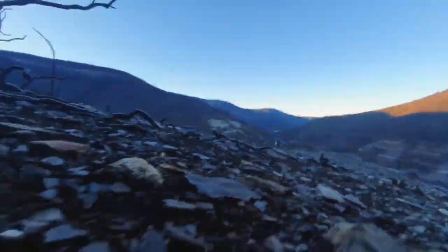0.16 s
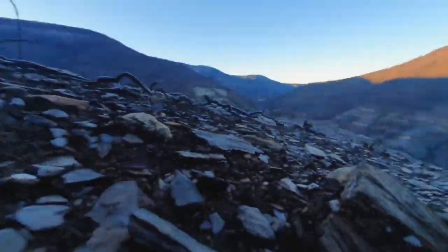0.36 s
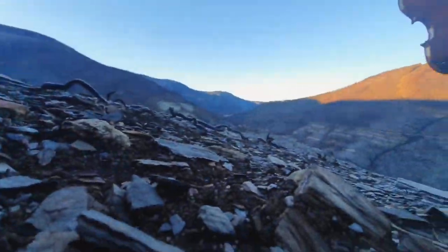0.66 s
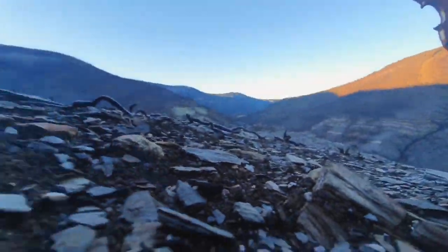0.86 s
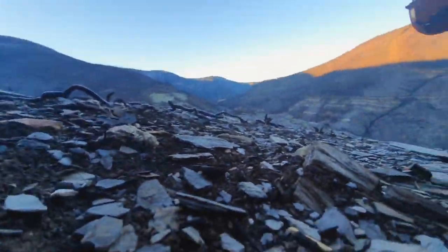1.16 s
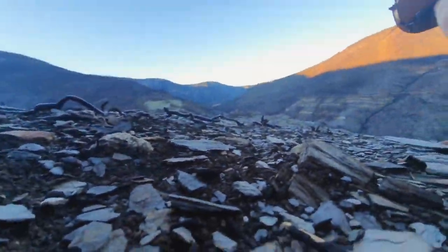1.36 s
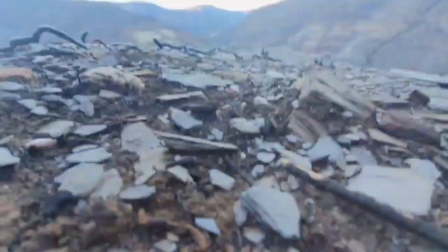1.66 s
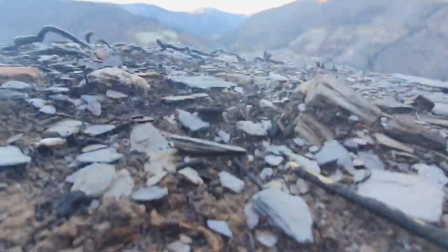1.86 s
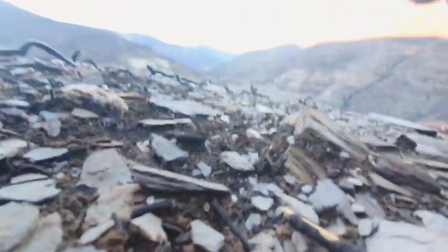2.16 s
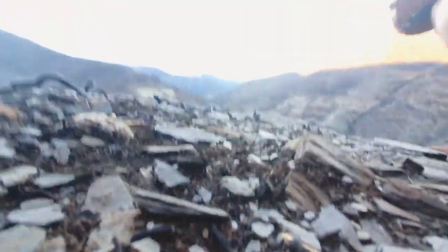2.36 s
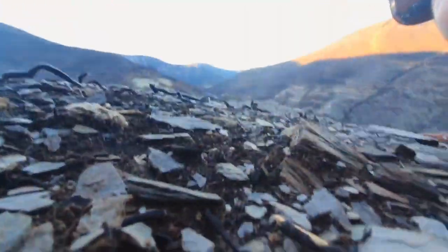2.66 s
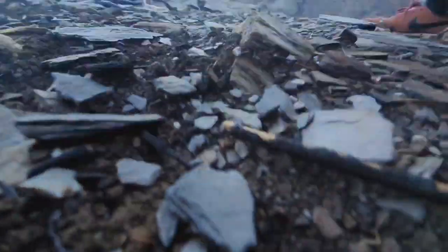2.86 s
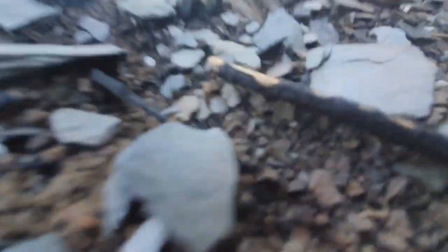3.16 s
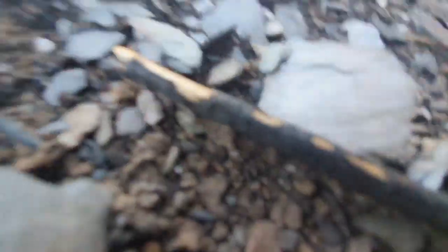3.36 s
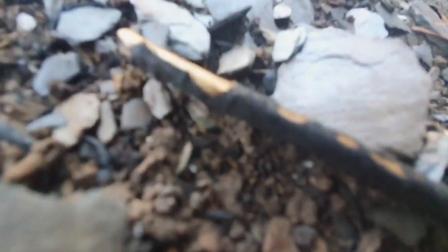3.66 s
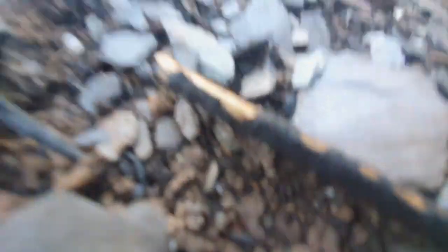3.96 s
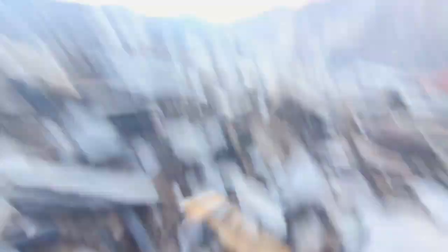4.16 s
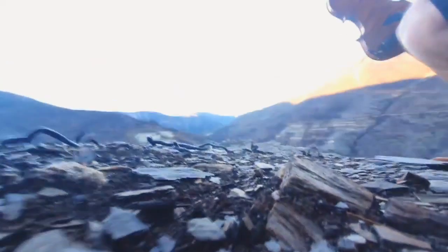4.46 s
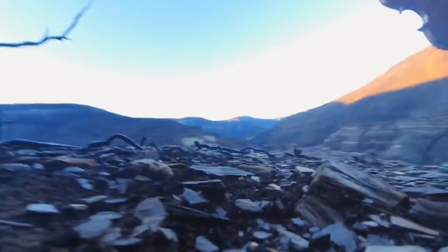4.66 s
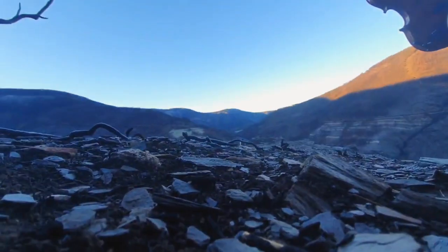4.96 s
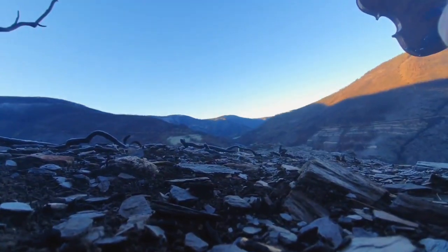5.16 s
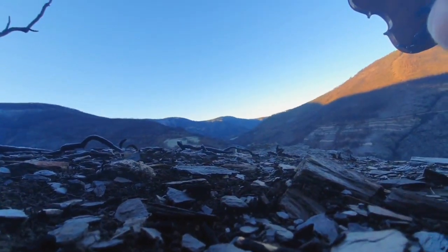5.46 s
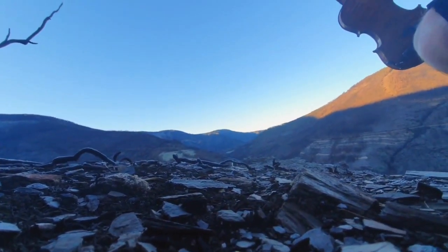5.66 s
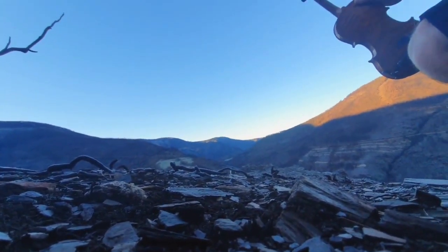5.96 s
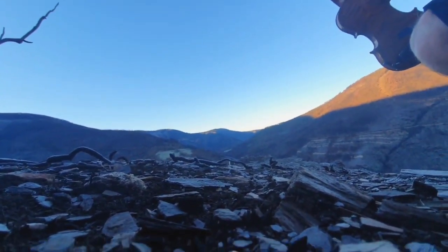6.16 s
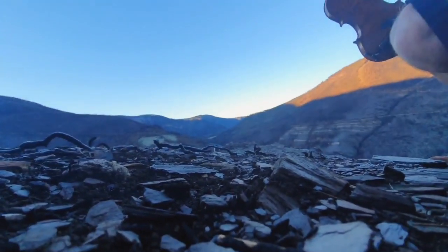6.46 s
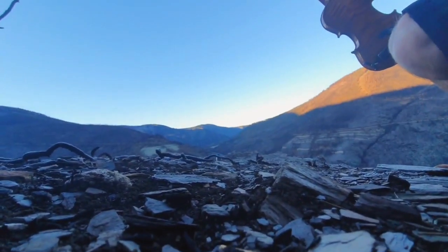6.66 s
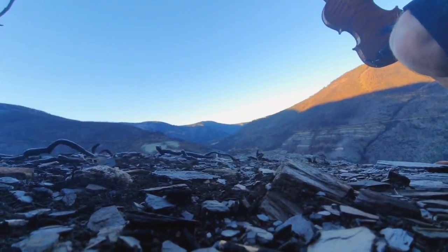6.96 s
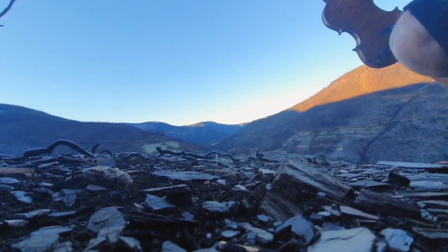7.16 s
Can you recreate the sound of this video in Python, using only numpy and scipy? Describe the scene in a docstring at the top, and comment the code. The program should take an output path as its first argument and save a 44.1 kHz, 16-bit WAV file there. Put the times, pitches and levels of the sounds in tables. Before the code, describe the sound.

A camera is shuffled into place on loose slate, heard very close through its own microphones, with faint open air and no echo. It starts quietly with low grip rumble and light scraping. At 0.5 seconds comes a first bump with a stony click. Short, gritty, rasping strokes follow unevenly, shifting between left and right, mixed with ticking crumbs and brief clinks of rocking slabs. The hardest knock, hollow with a sharp crack, lands just after 2 seconds. Scraping continues, with more knocks near 3 and 3.4 seconds. A palm rubs softly over the casing from about 3.8 to 4.4 seconds. A busy cluster of knocks, low thumps and stone snaps runs from 4.2 to 4.8 seconds. A click and scrape come at 5.4, bumps at 5.9, and a firm scrape with two sharp knocks around 6.4. The strokes weaken and fade by about 7 seconds.

```python
"""A camera is shuffled into place on loose slate, on a still hillside. First comes faint air and the
rumble of the hand's grip, as the housing starts to scrape over shards and under fingers in short,
gritty strokes, right by its two microphone ports. A slab rings faintly; from half a second on, firm
contacts knock the shell and thump the body on its mount, stone edges snap and loose slabs clink.
The hardest knock lands just after 2 s, the palm rubs the shell around 4 s, and by 7 s the strokes fade."""
import sys
import numpy as np
from scipy import signal
from scipy.fft import rfft, irfft, next_fast_len
from scipy.io import wavfile
from scipy.ndimage import uniform_filter1d, map_coordinates

SR = 44100
rng = np.random.default_rng(int(sys.argv[2]) if len(sys.argv) > 2 else 0)


def master(y):
    """Save y as 16-bit WAV."""
    cut = np.clip(np.atleast_2d(y).T, -1, 1)
    pcm = np.round(cut * 32767)  # scale
    wavfile.write(sys.argv[1], SR, pcm.astype(np.int16))


N = 322371

# Tone of the open air: frequency_hz, level_db
AIR_TONE = [(25, -6.5), (100, -9.5), (400, -3.5), (900, -19.5), (2000, -28.5), (6000, -31.5),
            (16000, -32.5)]
# Steady trembling of the hand: time_s, level_db
HAND_TREMOR = [(0, -71), (.35, -64.5), (.7, -60), (1, -63), (1.65, -53), (1.9, -59), (2.5, -65), (3.3, -52),
               (4.3, -53), (4.9, -55), (5.08, -69), (5.25, -58.5), (5.53, -82), (5.75, -54.5), (6.2, -61),
               (6.85, -67.5), (7.31, -75)]
# Tone of the shaking camera body: frequency_hz, level_db
SHAKE_TONE = [(18, -26), (40, -5), (72, 2.5), (120, -4), (200, -9), (400, -22)]
# Sliding strokes. In every table, a side_db above zero means left, below zero right. Columns:
# full_pressure_s, rise_s, hold_s, fall_s, rasp_db, hiss_over_rasp_db, drone_over_rasp_db, side_db
SLIDING_STROKES = [(0.046, .04, 0.04, 0.32, -74.5, -13, -8, -10),
                   (0.426, .05, 0.11, 0.19, -58.5, -8.5, -2.5, -5),
                   (0.667, 0.08, 0.15, 0.12, -48, -5.5, 1, 6.5),
                   (0.851, 0.037, 0.026, 0.043, -40.5, -10, -5.5, 9),
                   (1.057, 0.0022, 0.044, 0.043, -56.5, 8, 9, 18),
                   (1.09, 0.015, 0.015, 0.19, -38.5, 0, -14, 19),
                   (1.148, 0.08, 0.029, 0.054, -45, -7, 0.5, 15),
                   (1.286, 0.16, 0.15, .1, -51, -13.5, -5, 3),
                   (1.478, 0.14, 0.084, 0.12, -43.5, -2, -4.5, 1),
                   (1.681, 0.059, 0.0047, 0.063, -45, -1.5, 1.5, -1),
                   (1.794, 0.12, 0.08, 0.036, -67, 2, 4.5, 14),
                   (2.046, 0.1, 0.044, 0.031, -36.5, -15.5, -3.5, 10.5),
                   (2.118, 0.11, 0.042, 0.0088, -31.5, -2.5, -14, 18),
                   (2.189, .03, 0.038, 0.054, -56, 2, 3, 16),
                   (2.286, 0.027, 0.0071, 0.029, -58, 8.5, 5, 20),
                   (2.371, 0.07, 0.099, 0.072, -53, -3.5, -3.5, 0),
                   (2.559, 0.1, 0.0079, 0.06, -59, -0.5, -1, -7),
                   (2.708, 0.032, 0.11, 0.068, -43, -5, -6.5, -2),
                   (2.922, 0.031, 0.0053, 0.046, -39, -4, -4, 2),
                   (3.04, 0.21, 0.036, 0.074, -42.5, -6, -6, -1),
                   (3.223, 0.094, .005, 0.036, -42, -7, -4.5, 6),
                   (3.283, 0.055, 0.043, 0.058, -38, -4.5, -1, 11),
                   (3.377, 0.029, 0.015, 0.047, -42.5, 2.5, 3, -2),
                   (3.454, 0.094, 0.016, 0.088, -46, -8, -15, -1),
                   (3.574, 0.11, 0.017, 0.055, -42, -5.5, -3.5, -3),
                   (3.69, 0.036, 0.0088, 0.056, -45, -3.5, 1, 14),
                   (3.784, 0.046, 0.012, 0.021, -41.5, -9, -4, -5),
                   (3.807, 0.061, 0.061, 0.32, -63.5, 1.5, 3, 6),
                   (4.032, 0.063, 0.15, 0.11, -60, 1.5, 0, -3.5),
                   (4.268, 0.1, 0.036, 0.091, -41.5, -4.5, 5.5, 1.5),
                   (4.546, 0.13, 0.22, 0.16, -60.5, -10.5, 6.5, 0),
                   (4.732, 0.02, 0.013, 0.0083, -40, -8, 5.5, 3.5),
                   (4.797, 0.012, 0.0078, 0.039, -39.5, 3.5, -1, 11),
                   (4.886, 0.12, 0.11, 0.091, -64, 3.5, 3, 4),
                   (5.194, 0.035, 0.11, 0.07, -67, -1.5, 6.5, -3),
                   (5.404, 0.048, 0.0027, 0.051, -41, 0, 0.5, -3.5),
                   (5.46, .04, 0.029, 0.055, -56.5, -9, -6.5, -4),
                   (5.602, 0.075, 0.013, 0.1, -48, -6.5, -3, -3.5),
                   (5.692, 0.038, 0.024, 0.051, -43, -2, -2.5, 0), (5.81, .06, 0.0885, 0.043, -73, 4, 9, 4),
                   (5.914, 0.022, 0.041, 0.03, -44.5, -3, 3, 6),
                   (6.081, 0.067, 0.0079, 0.015, -51, 0, -2, 12),
                   (6.187, 0.3, 0.19, .1, -70.5, 3.5, 3.5, 10),
                   (6.358, 0.054, 0.036, 0.047, -34.5, -5, -2, 1.5),
                   (6.41, 0.085, 0.016, 0.066, -37.5, -1, -3, -5),
                   (6.543, 0.057, 0.03, 0.078, -53.5, -1, 1, 0),
                   (6.718, 0.045, 0.0091, 0.088, -52, -1, 2, -2),
                   (6.776, 0.053, 0.014, 0.055, -50, -0.5, -0.5, -3),
                   (7.018, 0.067, 0.058, 0.049, -68.5, -14.5, 0.5, 5.5),
                   (7.17, .04, 0.019, 0.053, -66, -25, -1, 5)]
# Pitch at which the touching edge rasps: time_s, pitch_hz
EDGE_PITCH = [(0.1, 1880), (0.85, 2100), (1.15, 1960), (1.32, 2080), (2.12, 2090), (2.8, 2080), (3.3, 1880),
              (3.55, 2060), (4.3, 1850), (5.65, 2040), (6.35, 1950)]
# Tone of a blunt face rasping: frequency_hz, level_db
BLUNT_TONE = [(600, -27), (1100, -5), (1700, 2), (2050, 2), (2700, -5.5), (3300, -12), (5000, -39.5)]
# Tone of the sliding hiss at each port: frequency_hz, level_db
LEFT_HISS_TONE = [(1900, -27.5), (2900, -6), (3550, -1.5), (4050, -2), (4550, -0.5), (5100, -3.5),
                  (5600, 0), (6250, -3.5), (7000, -12.5), (8400, -10), (13000, -17), (16000, -26.5)]
RIGHT_HISS_TONE = [(1900, -29), (2900, -4.5), (3700, 2.5), (4600, -7.5), (6000, -8.5), (7200, -12),
                   (8700, -11.5), (10500, -7), (13000, -10.5), (16000, -20)]
# Tone of the shell's low drone: frequency_hz, level_db
DRONE_TONE = [(90, -11.5), (190, 0.5), (390, -2.5), (520, -1.5), (780, -1), (1000, -6.5), (1300, -7.5),
              (2200, -18)]
# High ringing of the housing: pitch_hz, width_hz, level_db
HOUSING_RINGS = [(1870, 440, 5.5), (3320, 210, 4), (4560, 620, -7.5), (5630, 320, -8.5), (8400, 500, -10),
                 (11200, 380, -12)]
# Loose slabs rocking (a ring_s is the time to fade by 60 dB): start_s, level_db, pitch_hz, ring_s, side_db
SLAB_CLINKS = [(0.17, -72, 1421, .2, -3), (0.875, -23.5, 725, 0.013, -9),
               (1.0552, -16.5, 670, 0.0096, -5.5), (1.9863, -12, 3697, 0.0047, -9),
               (2.977, -14, 834, 0.011, -9), (3.536, -22, 560, 0.0092, -27),
               (3.633, -29.5, 520, 0.013, -12), (3.841, -38, 620, 0.025, 8), (4.2902, -13, 810, 0.015, -12),
               (4.306, -20.5, 617, 0.023, -14), (4.5153, -21, 740, 0.0057, -32),
               (4.6402, -12.5, 530, 0.0084, -17.5), (4.7434, -13, 1310, 0.016, -1),
               (4.7455, -14, 600, 0.0088, -3), (4.9607, -23.5, 520, 0.0064, -14),
               (5.4105, -18.5, 1050, 0.0063, -11), (6.008, -24, 760, 0.0055, -14)]
# Blunt contacts; each tone slides down through its pitch: start_s, knock_db, pitch_hz, thump_db, side_db
BLUNT_KNOCKS = [(0.5195, -20.5, 510, -32, -4.5), (0.5221, -15.5, 114, -15.5, -1.5),
                (1.549, -16, 1060, -48, -19), (1.562, -24.5, 600, -20.5, -17),
                (1.631, -33, 200, -27.5, -17), (2.1599, 5, 418, -14.5, -3.5),
                (2.177, -8.5, 205, -28.5, -11.5), (2.977, -10, 407, -23, -11),
                (3.062, -23.5, 375, -16, -16), (3.305, -18, 216, -35, -4), (3.357, -8, 700, -11, -4.5),
                (3.385, -12.5, 251, -25.5, -7.5), (3.947, -39, 150, -33.5, -4), (4.239, -17, 830, -35, -14),
                (4.2571, -14, 1310, -29, -8), (4.2915, -16, 960, -19, -7), (4.568, -17.5, 332, -21.5, -16),
                (4.59, -4.5, 654, -16, -15), (4.738, -8, 1320, -26, -1), (4.7429, -9, 900, -17, -0.5),
                (4.79, -17.5, 410, -48, 2), (5.756, -34, 260, -31, 2), (5.79, -41, 330, -37.5, 0),
                (5.906, -21.5, 178, -30, 9), (5.914, -7.5, 377, -19.5, 6), (5.936, -10, 400, -18.5, 10),
                (5.951, -13.5, 275, -27, 7), (6.3484, -14, 1720, -34, -9), (6.3934, -11, 1720, -33, -12),
                (6.266, -34, 254, -34, 5), (6.772, -44, 198, -23, -1.5)]
# Ringing of the hollow shell after a hard knock: pitch_hz, level_over_knock_db, ring_s
SHELL_RINGS = [(140, -24.5, 0.048), (271, -31, .03), (559.4, -25, 0.0094), (835, -19.5, 0.052)]
# Hard stone edges striking: start_s, relative_level_db, centre_hz, side_db
EDGE_SNAPS = [(0.5204, -29, 3180, 17), (1.055, -42.5, 2650, 18), (1.3808, -31.5, 2680, 17),
              (1.4021, -38.5, 2800, 14), (1.552, -33, 2320, -22), (1.9856, -29, 3630, -3.5),
              (2.0429, -26.5, 3360, -1), (2.159, -20.5, 2740, 10), (2.161, -17, 4200, 16),
              (2.177, -34.5, 1700, -5), (2.2866, -47.5, 4640, 26), (2.309, -50, 5040, 24),
              (2.445, -38.5, 5180, 18), (2.68, -41.5, 2330, -6), (2.856, -49.5, 3600, 4),
              (2.976, -31, 1470, -5), (3.15, -42.5, 1490, -3), (3.218, -38, 2080, -4),
              (3.2859, -30, 2720, 18.5), (3.3556, -19.5, 2290, 9), (3.3591, -14.5, 4200, 16.5),
              (4.2574, -32.5, 1800, -1), (4.569, -39, 2270, 9), (4.59, -24.5, 2500, 21),
              (4.714, -38, 3460, 8), (4.73, -36, 3590, 11), (4.7374, -20.5, 3600, 19),
              (4.7437, -19, 3300, 10), (4.7885, -30.5, 4100, 25), (4.8097, -38, 4310, 20),
              (4.8587, -48, 3760, 15), (4.933, -51, 2500, 1), (5.194, -50.5, 2250, -5.5),
              (5.3128, -46, 5910, 20), (5.4104, -32, 2720, -2), (5.8855, -43.5, 3360, 8),
              (5.9143, -29.5, 2500, 22), (5.934, -32, 2200, -1), (6.2472, -53, 4300, 9),
              (6.348, -26, 1950, 2), (6.3527, -31, 2600, 4), (6.3933, -26.5, 2040, -17),
              (7.11, -66.5, 4490, 13)]
# The palm rubbing as the body is tilted: time_s, level_db
PALM_LEVEL = [(3.74, -110), (3.83, -55), (3.98, -60.5), (4.15, -50.5), (4.3, -49), (4.39, -67), (4.5, -110)]
# Hollow tone of that rub: frequency_hz, level_db
PALM_TONE = [(230, -15), (450, -2), (580, 0.5), (810, -4), (1250, -21.5)]

FIRM_DB = -40  # level of a firm stroke
OPPOSITE = np.array([[1], [-1]])  # plus on the left, minus on the right


def amp(db):
    """Turn decibels into a gain to multiply by."""
    return 10 ** (np.asarray(db) / 20)


def unit(x):
    """Scale a sound to an average (rms) level of 1."""
    return x / np.sqrt(np.mean(x ** 2) + 1e-20)


def curve(rows):
    """Join (time, value) points with straight lines, one value per sample."""
    times, values = np.transpose(rows)
    return np.interp(np.arange(N) / SR, times, values)


def wobble(rate_hz):
    """A smooth curve through rate_hz random points a second."""
    points = rng.standard_normal(int(N * rate_hz / SR) + 4)
    return map_coordinates(points, [np.arange(N) * rate_hz / SR])


def filtered(x, response):
    """Multiply each frequency in x by response(hz)."""
    length = x.shape[-1]
    padded = next_fast_len(length + 4096)
    return irfft(rfft(x, padded) * response(np.fft.rfftfreq(padded, 1 / SR)), padded)[..., :length]


def coloured(x, tone):
    """Shape x with a tone table, then scale it to level 1."""
    points_hz, db = np.transpose(tone)
    gain = lambda hz: amp(np.interp(np.log(hz + 1), np.log(points_hz), db, left=-120, right=-120))
    return unit(filtered(x, gain))


def ports(side_db):
    """Left and right gains that move a sound sideways but keep its power."""
    gains = amp(OPPOSITE * side_db / 2)
    return gains / np.sqrt(np.mean(gains ** 2, axis=0))


def add(track, start_s, sound):
    """Mix a stereo sound into the track at start_s."""
    part = track[:, max(round(start_s * SR), 0):][:, :sound.shape[1]]
    part += sound[:, :part.shape[1]]


def air():
    """Faint open air over the valley."""
    return amp(-70) * coloured(rng.standard_normal((2, N)), AIR_TONE)


def grip_rumble(drone_gain, shake_db=-46, follow=0.8):
    """The grip shakes the body in uneven lurches, harder during a stroke and mostly on the right."""
    stroke_shake = amp(shake_db) * (drone_gain / amp(FIRM_DB)) ** follow
    shake = np.hypot(amp(curve(HAND_TREMOR)), stroke_shake)
    lurch_db = 3 * np.minimum(wobble(14), 1.5)
    return shake * amp(lurch_db) * ports(-8) * coloured(rng.standard_normal((2, N)), SHAKE_TONE)


def stroke_pressure(swell_db=24, rasp_side_share=0.3, drone_slope=0.85):
    """Each stroke presses, holds and lets go; gives the gains of the rasp, hiss and drone."""
    t = np.arange(N) / SR
    rasp, hiss, drone = np.zeros((2, N)), np.zeros((2, N)), np.zeros(N)
    for full_s, rise_s, hold_s, fall_s, rasp_db, hiss_db, drone_db, side_db in SLIDING_STROKES:
        near = slice(max(round((full_s - 2 * rise_s) * SR), 0), round((full_s + hold_s + 2 * fall_s) * SR))
        early = np.maximum(full_s - t[near], 0) / rise_s
        late = np.maximum(t[near] - full_s - hold_s, 0) / fall_s
        slack_db = swell_db * (early + late)
        rasp[:, near] += (ports(rasp_side_share * side_db) * amp(rasp_db - slack_db)) ** 2
        hiss[:, near] += (ports(side_db) * amp(rasp_db + hiss_db - slack_db)) ** 2
        drone[near] += amp(rasp_db + drone_db - drone_slope * slack_db) ** 2
    return np.sqrt(rasp), np.sqrt(hiss), np.sqrt(drone)


def friction(slips_per_s, spread_db, smooth):
    """Tiny slips of uneven size, over the smooth noise of finer contacts."""
    slips = (rng.random(N) < slips_per_s / SR) * amp(spread_db * np.minimum(rng.standard_normal(N), 2))
    crackle = unit(slips * rng.standard_normal((2, N)))
    return unit(crackle + smooth * rng.standard_normal((2, N)))


def moving_contact(x, depth_db, bands=3, frames=12):
    """Narrow bands ring up and die away as the point of contact moves over the shards."""
    spectrum = signal.stft(x, nperseg=512)[2]
    patches = uniform_filter1d(rng.standard_normal(spectrum.shape[1:]), bands, axis=0)
    patches = uniform_filter1d(patches, frames, axis=1)
    return signal.istft(spectrum * amp(depth_db * unit(patches)), nperseg=512)[1][:, :N]


def edge_rasp(slips, blunt_hz=1860, sharp_span_hz=200, width_hz=290):
    """A sharp edge grates on a higher, narrower band than a blunt face."""
    pitch_hz = curve(EDGE_PITCH)
    sharpness = np.clip((pitch_hz - blunt_hz) / sharp_span_hz, 0, 8 / 9)
    flutter = filtered(slips, lambda hz: 1 / (1 + (hz / width_hz) ** 2))
    narrow_ring = unit(flutter * np.cos(2 * np.pi * np.cumsum(pitch_hz) / SR))
    return np.sqrt(1 - sharpness) * coloured(slips, BLUNT_TONE) + np.sqrt(sharpness) * narrow_ring


def scrape(rasp_gain, hiss_gain, drone_gain):
    """Sticking and slipping makes the housing rasp, the shell drone and each port hiss in its own way."""
    grip = amp(1.5 * wobble(55) + 1.1 * wobble(220))
    slips = moving_contact(friction(slips_per_s=3500, spread_db=4, smooth=1.1) * grip, depth_db=2.5)
    shared = slips + 0.27 * slips[::-1]  # the housing's main ring reaches both ports
    rasp = rasp_gain * ports(-1.7) * edge_rasp(shared)
    hiss = hiss_gain * np.array([coloured(slips[0], LEFT_HISS_TONE), coloured(slips[1], RIGHT_HISS_TONE)])
    rub = moving_contact(friction(slips_per_s=500, spread_db=4.5, smooth=1.3) * grip, depth_db=1.5)
    drone = drone_gain * ports(-10) * coloured(rub, DRONE_TONE)
    return rasp + hiss + drone


def housing(hz):
    """How the housing answers a tap at each frequency: strongly near its own pitches."""
    return sum((-1) ** k * amp(db) * 1j * hz * width / (pitch ** 2 - hz ** 2 + 1j * hz * width)
               for k, (pitch, width, db) in enumerate(HOUSING_RINGS))


def grit(hiss_gain, crumbs_per_s=38, spread_db=5, level_db=-54):
    """Single crumbs of slate tick against the housing, harder while it slides."""
    effort = np.sqrt(np.mean(hiss_gain ** 2, axis=0)) / amp(FIRM_DB)
    hits = rng.random(N) < crumbs_per_s / SR
    crumbs = hits * amp(spread_db * np.clip(rng.standard_normal(N), -2, 1.5))
    return amp(level_db) * effort ** 0.75 * ports(14) * unit(filtered(crumbs, housing))


def slabs(rise_cycles=0.28, port_lag_rad=1.62):
    """A rocking slab swells within a cycle and rings at one pitch until the ground damps it."""
    out, t = np.zeros((2, N)), np.arange(SR // 5) / SR
    for start_s, level_db, pitch_hz, ring_s, side_db in SLAB_CLINKS:
        ring = np.sin(2 * np.pi * pitch_hz * t + OPPOSITE * port_lag_rad / 2)
        swell = (1 - np.exp(-pitch_hz * t / rise_cycles)) ** 2
        add(out, start_s, ports(side_db) * ring * swell * amp(level_db - 60 * t / ring_s))
    return out


def shell(t, contact_hz):
    """The hollow shell rings briefly; a soft contact leaves its higher pitches quiet."""
    return sum(amp(db - 60 * t / ring_s) * np.sin(2 * np.pi * hz * t) / (1 + (hz / contact_hz / 2) ** 2)
               for hz, db, ring_s in SHELL_RINGS)


def knocks(start_ratio=1.71, soften=2, damping=1.055, rise_cycles=0.07,
           mount_hz=86, mount_ring_s=0.069, mount_rise_s=0.0005, port_lag_rad=1.81):
    """A knock starts hard and drops in pitch as the contact gives; the body then rocks on its mount."""
    out, t = np.zeros((2, N)), np.arange(SR // 6) / SR
    for start_s, knock_db, pitch_hz, thump_db, side_db in BLUNT_KNOCKS:
        detune, turn = rng.standard_normal(2)
        # the two ports move out of step, depending on which is nearer
        phase = OPPOSITE * np.copysign(port_lag_rad / 2, side_db + 0.5) + 0.78 * turn
        cycles = start_ratio * np.log1p(soften * pitch_hz * t) / soften
        swell = (1 - np.exp(-pitch_hz * t / rise_cycles)) ** 2  # softer contacts rise more slowly
        dent = np.sin(2 * np.pi * cycles - phase) * np.exp(-damping * pitch_hz * t) * swell
        knock = amp(knock_db) * (dent + OPPOSITE * shell(t, pitch_hz))
        thump_hz = mount_hz * np.exp(0.18 * detune)
        thump_gain = amp(thump_db - 60 * t / mount_ring_s) * (1 - np.exp(-t / mount_rise_s))
        thump = thump_gain * np.sin(2 * np.pi * thump_hz * t - phase)
        add(out, start_s, ports(side_db) * (knock + thump))
    # the knocks carry little below 56 Hz
    return signal.sosfilt(signal.butter(2, 56, "highpass", fs=SR, output="sos"), out)


def snaps(crack_s=0.0067, rise_s=0.00027, tail_s=0.041, tail_db=-32, width_octaves=0.75, direct=1.05):
    """A stone edge cracks for a millisecond or two, rings the housing and trails off in crumbs."""
    out, t = np.zeros((2, N)), np.arange(SR // 16) / SR
    fade = (amp(-60 * t / crack_s) + amp(tail_db - 60 * t / tail_s)) * (1 - np.exp(-t / rise_s))
    for start_s, level_db, centre_hz, side_db in EDGE_SNAPS:
        band = lambda hz: 1 / (1 + (np.log2((hz + 1) / centre_hz) / width_octaves) ** 2)
        burst = fade * rng.standard_normal((2, len(t)))
        left, right = filtered(burst, lambda hz: band(hz) * (direct + housing(hz)))
        add(out, start_s, amp(level_db - 12) * ports(side_db) * np.array([unit(left), unit(right)]))
    return out


def port_dip(x, centre_hz=7250, width_hz=600, depth_db=-11):
    """The microphone ports swallow a narrow band of the treble."""
    return filtered(x, lambda hz: amp(depth_db * np.exp(-((hz - centre_hz) / width_hz) ** 2)))


def palm_rub():
    """Skin drags over the shell with a soft, hollow rub."""
    return amp(curve(PALM_LEVEL)) * ports(-3) * coloured(rng.standard_normal((2, N)), PALM_TONE)


def scene():
    """Everything reaches the ports directly; the open slope gives no echo."""
    rasp_gain, hiss_gain, drone_gain = stroke_pressure()
    sliding = scrape(rasp_gain, hiss_gain, drone_gain) + grit(hiss_gain)
    hand = palm_rub() + grip_rumble(drone_gain)
    hits = slabs() + knocks() + port_dip(snaps())
    return air() + hand + sliding + hits


def record(dry, top_hz=16200):
    """The loudest peaks are held to 0.9, and the treble above top_hz is cut off."""
    return filtered(np.clip(dry, -0.9, 0.9), lambda hz: 1 / (1 + (hz / top_hz) ** 120))


dry = scene()
out = record(dry)
master(out)
```